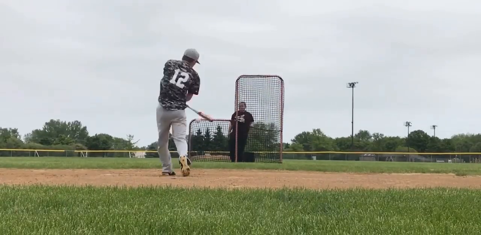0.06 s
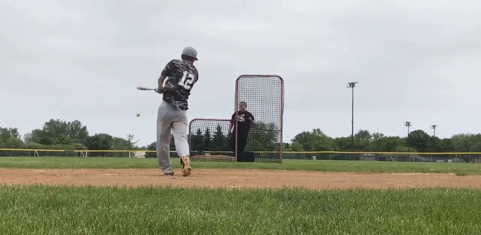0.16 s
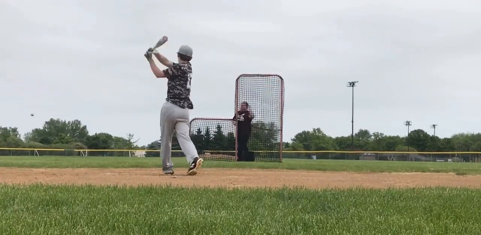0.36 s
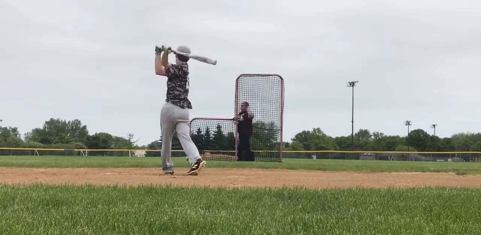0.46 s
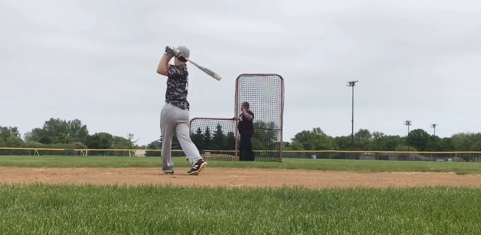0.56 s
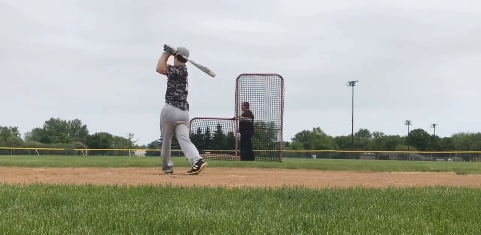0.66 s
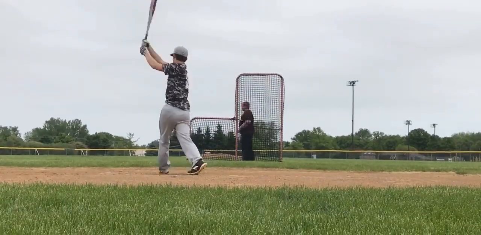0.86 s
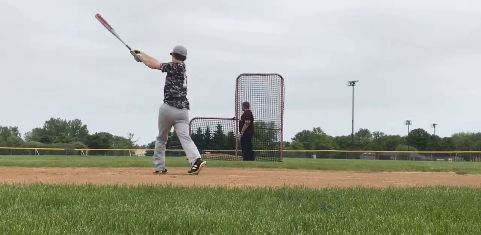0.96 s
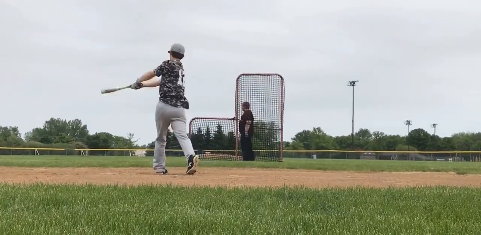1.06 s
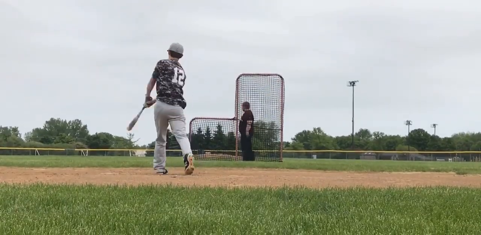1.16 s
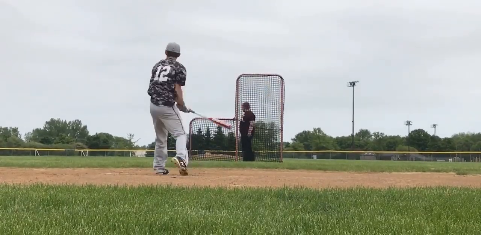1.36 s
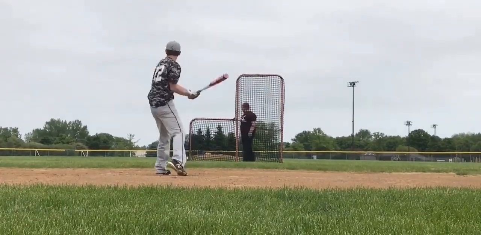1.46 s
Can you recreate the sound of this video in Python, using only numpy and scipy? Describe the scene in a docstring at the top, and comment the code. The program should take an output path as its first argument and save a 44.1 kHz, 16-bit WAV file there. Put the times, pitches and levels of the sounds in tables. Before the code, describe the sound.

A metal bat cracks a baseball with one sharp ringing ping on a quiet open field

```python
"""A metal bat hits a baseball on an open field: noise and a pressure pulse for the crack, damped modes for
the knock and barrel ping. Screens echo the blow with slower decay; ground and fences scatter the ping as noise.
Enveloped tones give the ring that swells again in the follow-through, and the far trees' returns.
A wavering engine hum and shaped noise for air and rumble lie beneath; noise swells give a bat swish, diffuse
treble echoes and a foot scuff, with faint hiss, ticks and bumps."""
import sys
import numpy as np
from scipy import signal
from scipy.fft import rfft, irfft
from scipy.io import wavfile

SR = 44100
rng = np.random.default_rng(int(sys.argv[2]) if len(sys.argv) > 2 else 0)


def unload_audio(sound):
    """Save the sound as a 16-bit wav file, at the path given as the first command line argument."""
    columns = np.transpose(np.atleast_2d(sound))
    # keep every value between -1 and 1, then stretch to whole-number steps
    steps = np.round(np.clip(columns, -1, 1) * 32767)
    wavfile.write(sys.argv[1], SR, steps.astype(np.int16))


N = 66150
T = np.arange(N) / SR
HIT_S = .2403

# contact noise spectrum: (frequency [Hz], relative level per Hz [dB])
CRACK_SPECTRUM = [(60, -21.5), (250, -3.5), (780, -9.5), (1300, 4.5), (1800, -3), (3300, 0.5), (4500, 2),
                  (7000, 0.5), (7800, -21.5), (8800, -6.5), (13300, -20.5), (15200, -13), (17000, -12.5)]


def amp(db):
    """Decibels to gain."""
    return 10 ** (np.asarray(db) / 20)


def noise(gain_at):
    """Unit-RMS noise whose spectrum follows a gain function of frequency."""
    f = np.maximum(np.arange(N // 2 + 1) * SR / N, 1)
    x = irfft(rfft(rng.standard_normal(N)) * gain_at(f), N)
    return x / x.std()


def coloured(points):
    """Unit noise with a spectrum of (Hz, dB) points, interpolated over log frequency."""
    hz, db = np.array(points).T
    return noise(lambda f: amp(np.interp(np.log(f), np.log(hz), db)))


def band(hz, octaves):
    """Unit noise in a bell-shaped band."""
    return noise(lambda f: np.exp(-.5 * (np.log2(f / hz) / octaves) ** 2))


def walk(rate_hz):
    """Slow random motion with unit spread."""
    return noise(lambda f: 1 / (1 + (f / rate_hz) ** 2))


def fall(start_s, t60_s, hold_s=0):
    """Sudden start, hold, exponential decay."""
    return (T >= start_s) * np.exp(-np.log(1000) * np.maximum(T - start_s - hold_s, 0) / t60_s)


def swell(at_s, spread_s):
    """Bell-shaped rise and fall."""
    return np.exp(-.5 * ((T - at_s) / spread_s) ** 2)


def turns(hz):
    """Phase of a moving pitch, in radians."""
    return 2 * np.pi * np.cumsum(hz) / SR


def tones(table, waver_hz):
    """Bell-shaped tone swells, each at its own slightly wavering pitch."""
    total = np.zeros(N)
    for at_s, hz, db, spread_s in table:
        phase = turns(hz + waver_hz * walk(40))
        total += amp(db) * swell(at_s, spread_s) * np.sin(phase)
    return total


def engine_hum():
    """Distant engine: a wavering fundamental and its octave, with moving level."""
    # (time [s], fundamental RMS level [dB])
    levels = [(0.0, -43), (0.254, -38), (0.27, -41.5), (0.504, -44.5), (0.542, -38.5), (0.684, -47),
              (0.726, -37), (0.76, -45), (0.838, -41), (1.114, -41.5), (1.152, -68), (1.182, -47),
              (1.278, -36.5), (1.436, -40.5), (1.466, -46.5), (1.5, -40.5)]
    mean_hz, wander_ratio, octave_db = 90.84, .0096, -22
    s, db = np.array(levels).T
    phase = turns(mean_hz * (1 + wander_ratio * walk(4)))
    wave = np.sin(phase) + amp(octave_db) * np.sin(2 * phase)
    return np.sqrt(2) * amp(np.interp(T, s, db)) * wave


def treble_air():
    """Treble air noise: band noise, quieter before the hit, at a slowly changing level."""
    # (time [s], level [dB])
    levels = [(0, -71.5), (.2, -67), (.5, -65), (.8, -67.5), (1.1, -65.5), (1.5, -65)]
    s, db = np.array(levels).T
    return amp(np.interp(T, s, db)) * band(2300, .85)


def open_air():
    """Open air: shaped noise with a slightly wandering level."""
    # (frequency [Hz], relative level per Hz [dB])
    spectrum = [(90, -16), (130, 0.5), (185, -1), (230, -7.5), (320, -9.5), (430, -15), (620, -17.5),
                (780, -27), (1000, -24), (1500, -28), (2600, -31), (4000, -43), (7400, -48.5), (16000, -49)]
    level_db, wander_db = -50, .7
    return coloured(spectrum) * amp(level_db + wander_db * walk(5))


def air_rumble():
    """Light rumble of air: low-frequency shaped noise."""
    # (frequency [Hz], relative level per Hz [dB])
    spectrum = [(15, -38.5), (30, -12.5), (52, 22), (80, 22.5), (120, 11.5), (170, -46)]
    return amp(-50.5) * coloured(spectrum)


def hiss():
    """Thin treble noise, faded in and out around the hit."""
    start_s, stop_s, fade_s, level_db = .205, .655, .008, -66.5
    fade_in = np.clip((T - start_s) / fade_s, 0, 1)
    fade_out = np.clip((stop_s - T) / fade_s + .5, 0, 1)
    return amp(level_db) * fade_in * fade_out * band(10000, 1.4)


def faint_ticks():
    """Sudden band-noise bursts with exponential decay."""
    # (time [s], level [dB], centre [Hz], bandwidth spread [octaves], T60 [s])
    bursts = [(.2168, -45, 1400, 1.2, .025), (1.045, -62, 12000, .5, .032)]
    return sum(amp(db) * fall(at_s, t60_s) * band(hz, octaves) for at_s, db, hz, octaves, t60_s in bursts)


def noise_swells():
    """Bat swish before the hit, diffuse treble echoes after it, a late foot scuff: swells of band noise."""
    # (time [s], time spread [s], centre [Hz], bandwidth spread [octaves], level [dB])
    swells = [(.229, .006, 900, 2.2, -57), (.366, .01, 6500, .25, -62), (.369, .011, 3700, .25, -59),
              (.56, .012, 3900, .18, -61), (1.098, .015, 3500, .9, -66)]
    return sum(amp(db) * swell(at_s, spread_s) * band(hz, octaves)
               for at_s, spread_s, hz, octaves, db in swells)


def contact(at_s):
    """First-touch click, a pressure swing as the barrel dents, then the crack and its ground scatter."""
    click_lead_s, click_db, click_t60_s = .0006, -17, .011
    push_width_s, push_db = .00008, -4.5
    crack_db, crack_t60_s = -21.5, .0096
    scatter_db, scatter_t60_s = -30, .055
    click = amp(click_db) * band(14000, 4.8) * fall(at_s - click_lead_s, click_t60_s)
    u = (T - at_s) / push_width_s - 4  # peak four widths after contact
    push = amp(push_db) * (1 - u ** 2) * np.exp(-.5 * u ** 2)
    crack_level = amp(crack_db) * fall(at_s, crack_t60_s)
    scatter_level = amp(scatter_db) * fall(at_s, scatter_t60_s)
    return click + push + coloured(CRACK_SPECTRUM) * (crack_level + scatter_level)


def knock(at_s):
    """The blow bends the whole bat: low, quickly damped modes."""
    # bending modes: (frequency [Hz], initial level [dB], T60 [s])
    modes = [(175, -21, .034), (260, -24, .024), (380, -23, .022), (612, -18.5, .028), (925, -17, .022),
             (1200, -25, .017)]
    return sum(amp(db) * fall(at_s, t60_s) * np.sin(2 * np.pi * hz * (T - at_s)) for hz, db, t60_s in modes)


def ping(at_s):
    """Barrel modes of alternating polarity beat together; each flutters once the bat is moving on."""
    # barrel modes: (frequency [Hz], initial level [dB], T60 [s])
    modes = [(2430, -27, .02), (2640, -13, .055), (2860, -8.3, .018), (3055, -28, .11), (2762, -37, .22),
             (3805, -34, .055), (2580, -35, .3), (4490, -38, .035), (5110, -36, .04), (5620, -38, .08),
             (6065, -39, .05), (6890, -37, .025), (9075, -39, .045), (10920, -42, .03), (11765, -47, .05)]
    hold_s, flutter_db, flutter_hz, flutter_onset_s = .0062, 4.5, 45, .02
    depth_db = flutter_db * np.clip((T - at_s) / flutter_onset_s, 0, 1) ** 2
    total = np.zeros(N)
    for k, (hz, db, t60_s) in enumerate(modes):
        polarity = -(-1) ** k
        level = amp(db + depth_db * walk(flutter_hz)) * fall(at_s, t60_s, hold_s)
        total += polarity * level * np.sin(2 * np.pi * hz * (T - at_s))
    return total


def field_scatter():
    """Ping scattered by ground and fences: flickering shaped noise with fast and slow decays."""
    # (frequency [Hz], relative level per Hz [dB])
    spectrum = [(1200, -43), (2350, -22.5), (2500, -12), (2590, 6), (2690, -15), (2770, 4), (2825, 0.5),
                (2880, 5), (2980, -23.5), (3070, 1.5), (3180, -23), (4700, -35.5), (5600, -28),
                (6600, -42.5), (16000, -54)]
    early_db, early_t60_s = -28, .39
    late_db, late_t60_s = -57, 2.5
    flicker_db = 3
    tail = amp(early_db) * fall(HIT_S, early_t60_s) + amp(late_db) * fall(HIT_S, late_t60_s)
    return coloured(spectrum) * tail * amp(flicker_db * walk(25))


def screen_echoes():
    """Screens return the blow as smeared noise, a ping and a narrow glint."""
    # (time [s], noise level [dB], glint level [dB])
    returns = [(0.2815, -36, -45.5), (0.3073, -47, -63)]
    noise_t60_s, ring_db = .036, -1.5  # ring gain is relative to the noise level
    glint_hz, glint_t60_s = 6030, .055
    total = np.zeros(N)
    for at_s, db, glint_db in returns:
        burst = coloured(CRACK_SPECTRUM) * fall(at_s, noise_t60_s)
        total += amp(db) * (burst + amp(ring_db) * ping(at_s))
        total += amp(glint_db) * fall(at_s, glint_t60_s) * band(glint_hz, .03)
    return total


def follow_through():
    """The swing turns the ringing barrel past the listener: a moving tone, its octave and side lobes."""
    # main ring: (time [s], pitch [Hz], RMS level [dB])
    sweep = [(.3, 2667, -48.5), (0.328, 2749, -46), (0.354, 2743, -33), (0.37, 2734, -48),
             (.378, 2767, -22.5), (0.388, 2756, -17), (.396, 2761, -16), (.408, 2763, -19),
             (0.422, 2753, -28.5), (.432, 2680, -58.5), (0.441, 2824, -44), (0.473, 2697, -93)]
    # side lobes: (time [s], pitch [Hz], peak level [dB], time spread [s])
    lobes = [(.352, 2592, -33.5, 0.012), (.374, 3055, -40.5, .017), (.408, 2605, -46, 0.0096),
             (.415, 3062, -51, 0.043)]
    octave_db = -52
    s, hz, db = np.array(sweep).T
    phase = turns(np.interp(T, s, hz))
    level = np.sqrt(2) * np.interp(T, s, amp(db), left=0, right=0)
    ring = level * (np.sin(phase) + amp(octave_db) * np.sin(2 * phase))
    return ring + tones(lobes, waver_hz=4)


def far_trees():
    """Far trees return the ping as separate tone swells."""
    # (time [s], pitch [Hz], peak level [dB], time spread [s])
    returns = [(.522, 2765, -49, 0.016), (.558, 2585, -45, 0.0091), (.597, 2750, -51.5, 0.0082),
               (.655, 2654, -51, 0.025), (.778, 2560, -71, 0.0079), (.818, 2780, -63.5, 0.029),
               (1.291, 2605, -57.5, 0.008)]
    return tones(returns, waver_hz=2.5)


def low_bumps():
    """Soft bumps: short, low, wavering tone swells."""
    # (time [s], pitch [Hz], peak level [dB], time spread [s])
    swells = [(.54, 64, -38.5, 0.0064), (1.112, 66, -33.5, 0.0089)]
    return tones(swells, waver_hz=9)


def scene():
    """Sum of all sources at the microphone, one channel."""
    background = engine_hum() + treble_air() + open_air() + air_rumble()
    small_sounds = hiss() + faint_ticks() + noise_swells() + low_bumps()
    blow = contact(HIT_S) + knock(HIT_S) + ping(HIT_S)
    surroundings = field_scatter() + screen_echoes() + far_trees()
    return (background + small_sounds + blow + surroundings + follow_through())[None]


def record(dry):
    """The microphone sheds deep bass; the recorder clips at full scale, then cuts the top."""
    low_cut_hz, top_hz = 44, 16300
    high_pass = signal.butter(2, low_cut_hz, "high", fs=SR, output="sos")
    low_pass = signal.ellip(8, .2, 70, top_hz, fs=SR, output="sos")
    x = signal.sosfilt(high_pass, dry)
    return signal.sosfilt(low_pass, np.clip(x, -1, 1))


dry = scene()
out = record(dry)
unload_audio(out)
```